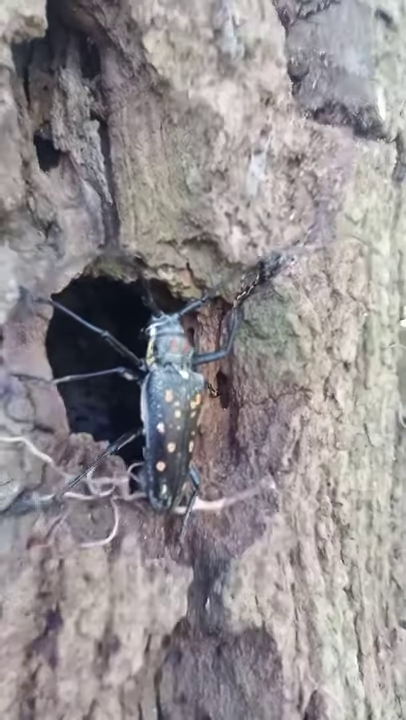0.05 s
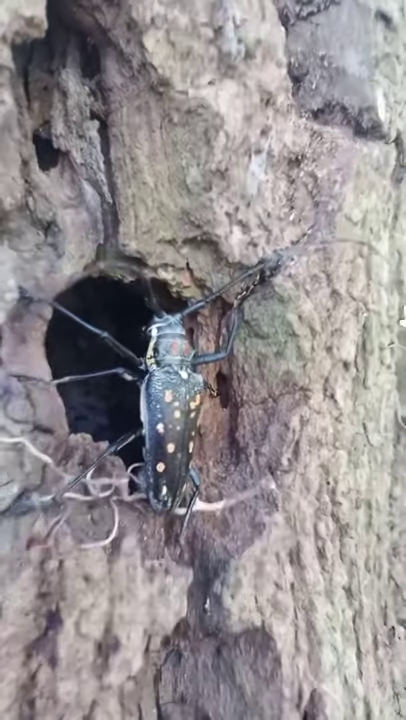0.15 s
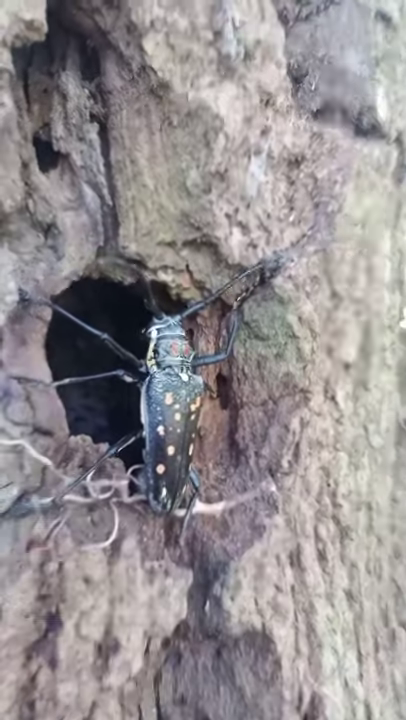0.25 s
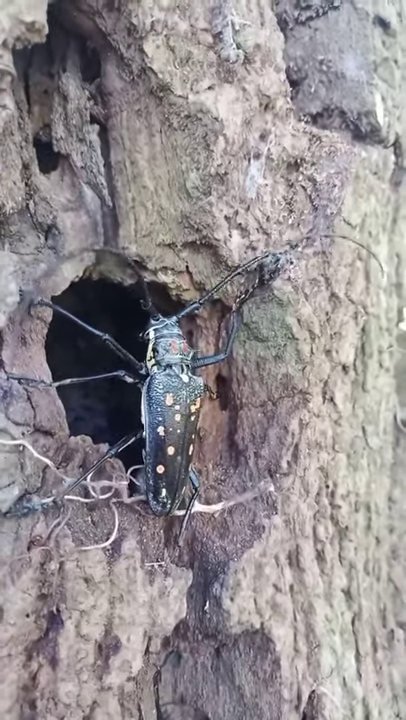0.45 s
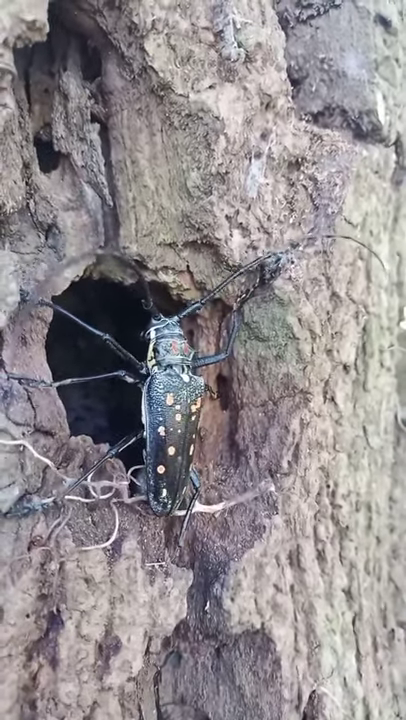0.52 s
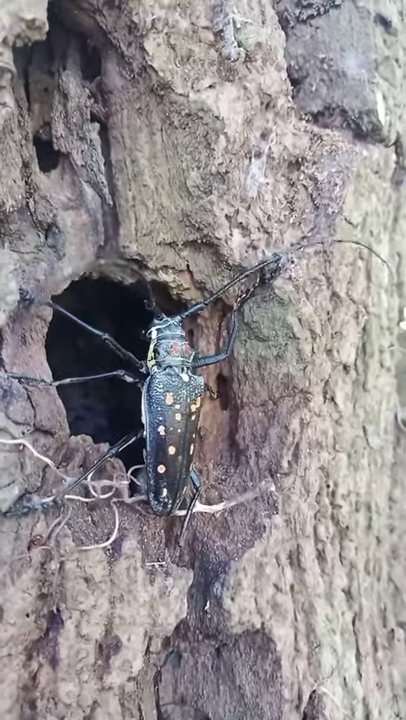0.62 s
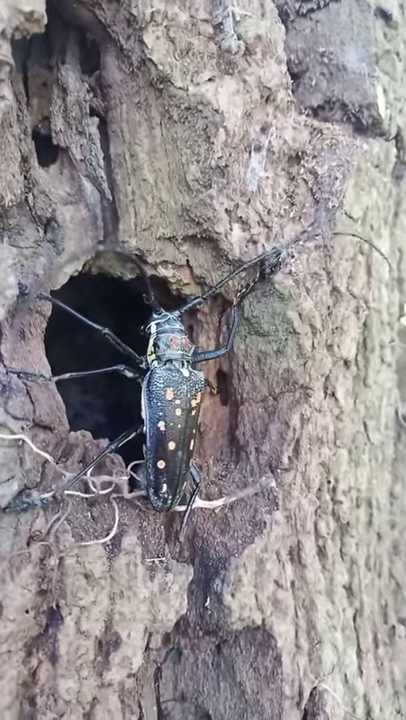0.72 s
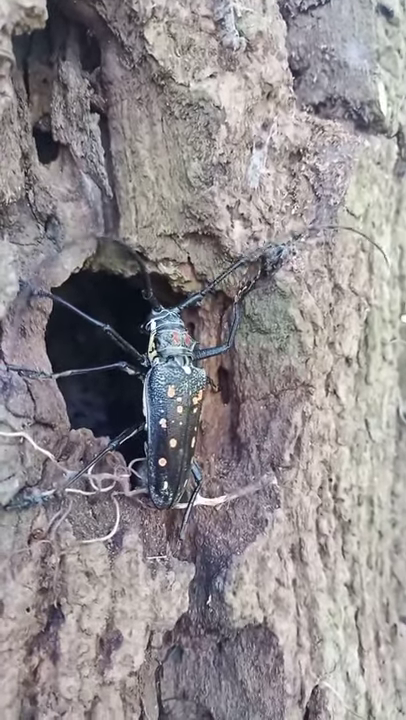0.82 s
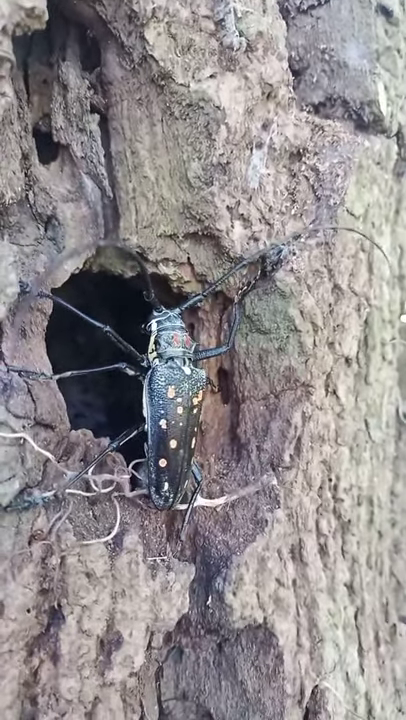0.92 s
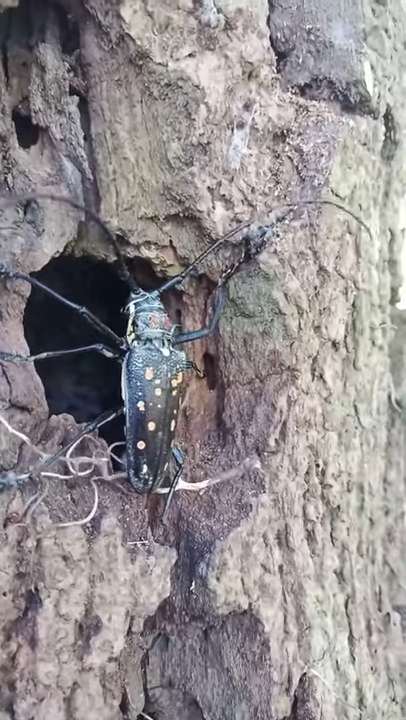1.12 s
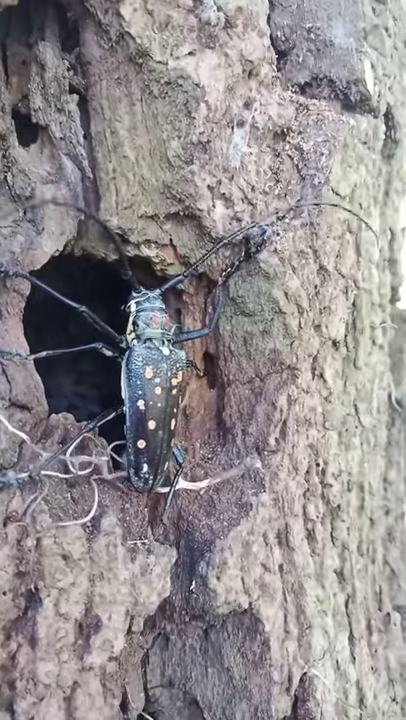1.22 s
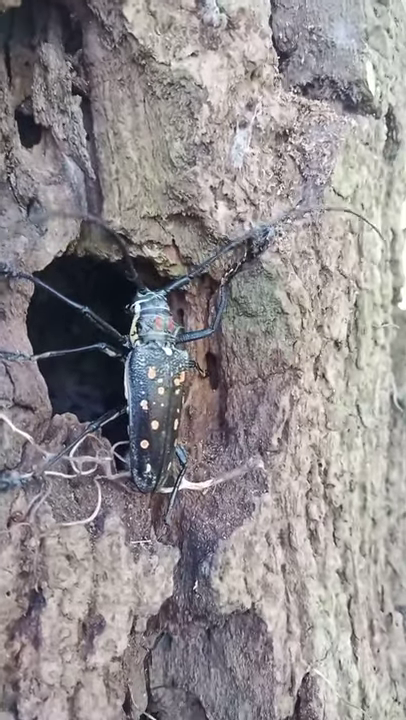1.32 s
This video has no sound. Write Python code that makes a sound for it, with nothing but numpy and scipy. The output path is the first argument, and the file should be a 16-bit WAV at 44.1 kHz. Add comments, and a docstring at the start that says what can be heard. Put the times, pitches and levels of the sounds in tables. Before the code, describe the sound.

A sharp, close knock hits the case of a hand-held microphone at about 0.2 seconds, its bright tail dying away by 0.6. Faint ticks and bumps follow. At 1.0 something, probably a finger, slides with a short hiss, then from 1.1 to the end at 1.35 makes a rasping creak of fast clicks. Soft woodland air and a faint low rumble lie underneath.

```python
"""Knock and creak on a camera

A hand-held camera in a quiet wood: soft air, a low rumble, a faint hum. One sharp knock thumps the
case, and a bright wash dies away after it. After a few faint ticks something rubs close to the
microphone, probably a finger on the case: it slides with a short hiss, then sticks and slips,
and the fast train of clicks makes a rasping creak."""
import sys
import numpy as np
from scipy import signal
from scipy.fft import rfft, irfft
from scipy.io import wavfile
from scipy.ndimage import uniform_filter1d

SR = 44100
rng = np.random.default_rng(int(sys.argv[2]) if len(sys.argv) > 2 else 0)


def wav_record(signal):
    """Record a signal, one row per channel, as 16-bit PCM in the file named by sys.argv[1]."""
    frames = np.transpose(np.atleast_2d(signal))
    bounded = np.clip(frames, -1, 1)
    # unit amplitude maps onto the largest positive 16-bit level
    quanta = np.round(bounded * 32767).astype(np.int16)
    wavfile.write(sys.argv[1], SR, quanta)


N = 59535
T = np.arange(N) / SR
HZ = np.fft.rfftfreq(N, 1 / SR)

# colour of the quiet air in the wood (frequency [Hz], relative level [dB])
AIR_COLOUR = [(25, -25), (55, -4), (130, 2), (230, -7.5), (480, -11), (800, -16), (1550, -14.5),
              (2000, -25), (4000, -26.5), (6800, -24), (8100, -32.5), (10200, -29), (13300, -44.5),
              (15500, -26)]
# fader on the air's lows and mids (time [s], gain [dB])
AIR_LOWS_FADER = [(0, 0.5), (.19, 4.5), (.45, -0.5), (.6, 0.5), (.95, 2), (1.15, -2), (1.35, -1.5)]
# fader on the low rumble (time [s], level [dB])
RUMBLE_FADER = [(0, -66), (.07, -62), (.3, -66), (.38, -61.5), (.5, -69.5), (.8, -82.5), (.92, -61.5),
                (.99, -70), (1.05, -58), (1.13, -79), (1.35, -76)]
# narrow swells of ringing (peak time [s], level [dB], centre [Hz], half length [s], width [octaves])
RING_SWELLS = [(0.044, -77, 3130, 0.063, 0.042), (0.055, -77, 4200, 0.045, .1),
               (0.055, -74.5, 2110, 0.058, 0.18), (0.202, -56.5, 321, 0.018, .08),
               (.278, -50, 380, 0.01, .06), (0.329, -57.5, 669, 0.026, 0.056),
               (0.309, -52.5, 1500, 0.028, 0.031), (0.423, -59, 1454, 0.024, 0.032),
               (0.501, -66, 4290, 0.023, 0.09), (0.527, -70.5, 5870, 0.053, 0.052)]
# soft low handling bumps (time [s], level [dB], centre [Hz], t60 [s], width [octaves])
HANDLING_BUMPS = [(.075, -64.5, 685, .1, 0.1), (.15, -62, 267, 0.24, 0.23), (.335, -55, 103, 0.15, 0.17),
                  (.422, -62, 650, 0.051, .6), (.598, -61.5, 396, 0.098, 0.8),
                  (.683, -59.5, 400, 0.11, 0.57), (.77, -63.5, 420, 0.067, 0.6),
                  (.857, -63, 654, 0.053, 0.23), (.943, -63, 450, 0.037, 0.71)]
# modes of the knocked case (frequency [Hz], level [dB], t60 [s], build-up [s])
CASE_MODES = [(400, -6, 0.017, 0.0024), (646, -29.5, 0.039, 0.00033), (1148, -30.5, 0.031, 0.003),
              (1440, -19.5, 0.02, 0.00035), (3660, -33, 0.02, 0.00042), (4100, -35, .02, 0.00085)]
# colour of the contact's crack (frequency [Hz], relative level [dB])
CRACK_COLOUR = [(150, -16), (400, -25), (900, 1), (1700, 6), (2900, -13.5), (4100, 2), (4800, -11),
                (6200, -1), (7500, -15), (10000, -7.5), (13500, -25), (15300, -4)]
# colour of the wash after the knock (frequency [Hz], relative level [dB])
WASH_COLOUR = [(60, -27), (180, -7), (420, -2.5), (650, -3.5), (850, -7.5), (1200, -2), (1460, 1),
               (1800, -6.5), (3000, -5.5), (4300, -0.5), (5000, -4), (6200, 0.5), (7700, -9), (9700, -3),
               (11500, -12), (13500, -20), (15300, -8)]
# decay of the wash, band by band (centre [Hz], t60 [s])
WASH_DECAY = [(200, 0.11), (500, 0.23), (1450, 0.35), (2500, 0.3), (5500, 0.38), (9500, 0.26),
              (15000, 0.26)]
# colour of the faint late echo (frequency [Hz], relative level [dB])
ECHO_COLOUR = [(300, -38), (1000, -18), (1450, 2), (2000, -26), (3300, -14), (4300, 8), (5000, 1.5),
               (6000, 10.5), (7700, -24), (10000, 2), (13000, -22)]
# colour of the fine crackle (frequency [Hz], relative level [dB])
CRACKLE_COLOUR = [(300, -27), (2000, -10), (5000, 1), (10000, 10), (13000, -8), (15500, -10)]
# small handling ticks (time [s], level [dB], centre [Hz], t60 [s], width [octaves])
HANDLING_TICKS = [(.544, -59, 3600, 0.035, 1), (.612, -67.5, 4340, 0.053, 0.32), (.822, -63, 5180, .05, .1),
                  (.833, -59.5, 2630, 0.031, 0.73), (.844, -66, 3030, 0.055, 0.15),
                  (.882, -71, 2600, 0.038, 0.27), (.882, -67, 7360, 0.026, 0.23)]
# colour of the sliding hiss (frequency [Hz], relative level [dB])
SLIDE_COLOUR = [(100, -3), (330, -8), (560, -15.5), (850, -5), (1200, -19), (1450, -14), (2000, -19.5),
                (3000, -25), (4400, -19.5), (5000, -22), (5550, -4.5), (6150, -8), (6800, -23), (8000, -22),
                (10100, -11), (12000, -34), (15500, -22)]
# hollow tones as the slide begins (delay [s], frequency [Hz], level [dB], t60 [s])
HOLLOW_TONES = [(0.0032, 545, -52.5, 0.077), (0.0068, 845, -50.5, 0.11), (0.0405, 335, -54.5, 0.16),
                (0.029, 1455, -62, 0.87)]
# pace of the stick-slip (time [s], rate [slips/s])
SLIP_PACE = [(1.07, 117), (1.0852, 368), (1.1073, 164), (1.1402, 108), (1.1463, 262), (1.1576, 188),
             (1.1728, 22), (1.1923, 254), (1.2095, 101), (1.2173, 268), (1.2312, 264), (1.2378, 144),
             (1.2573, 211), (1.2707, 157), (1.3196, 257), (1.3294, 352), (1.35, 201)]
# strength of the slips' clicks (time [s], gain [dB])
SLIP_FADER = [(1.07, -12), (1.1, -8), (1.145, -2), (1.19, -1.5), (1.25, -1), (1.295, 0.6), (1.325, -3.5),
              (1.35, -4.5)]
# colour of one slip's click (frequency [Hz], gain [dB])
SLIP_COLOUR = [(60, -15), (170, -10.5), (450, -29), (900, -35), (1300, -11.5), (1780, -11.5), (2350, -25),
               (3000, -20.5), (3700, -3.5), (4250, -3.5), (4650, -11), (5300, -4.5), (6100, -9),
               (6700, -14), (8200, -15), (9800, -9.5), (11200, -23), (12200, -30), (13200, -37),
               (15300, -28)]
# fader on the bright resonance that gives the creak its bite (time [s], gain [dB])
BITE_FADER = [(1.07, -34), (1.18, -13), (1.23, 1.5), (1.29, 2.5), (1.33, 4), (1.35, -8)]
# ring of the case after each slip (frequency [Hz], level [dB], t60 [s])
CASE_RING = [(179, -69.5, 0.063), (1260, -66.5, 0.056), (1430, -72.5, 0.053), (1623, -72, 0.14),
             (1735, -65.5, .05), (3820, -72, 0.058)]
# fader on the thin hiss between the slips (time [s], level [dB])
HISS_FADER = [(1.04, -100), (1.07, -82), (1.13, -90), (1.17, -67), (1.21, -74), (1.27, -66), (1.35, -82)]


def amp(db):
    """Decibels to gain."""
    return 10 ** (np.asarray(db) / 20)


def unit(x):
    """Scales to rms 1."""
    return x / np.sqrt(np.mean(x ** 2) + 1e-20)


def over_hz(points, hz=HZ):
    """Reads a table on a log-frequency axis."""
    knots, values = np.transpose(points)
    return np.interp(np.log(hz + 1), np.log(knots), values)


def over_time(points):
    """Reads a control curve at every sample."""
    return np.interp(T, *np.transpose(points))


def noise(spectrum_db):
    """Noise of rms 1 with the given colour."""
    return unit(irfft(rfft(rng.standard_normal(N)) * amp(spectrum_db), N))


def band(hz, octaves):
    """Noise of rms 1 around hz, 6 dB down at `octaves` to either side."""
    return noise(-20 * np.log10(1 + (np.log2((HZ + 1) / hz) / octaves) ** 2))


def rise(age, length):
    """Attack: a ramp from silence to full."""
    return np.clip(age / length, 0, 1)


def fade(age, t60):
    """Decay: holds until age zero, then falls 60 dB in t60."""
    return np.exp(-np.log(1000) * np.maximum(age, 0) / t60)


def through(x, response):
    """Convolves and keeps the length of the scene."""
    return signal.fftconvolve(x, response)[:N]


def click(colour, size=4096):
    """A tight, minimum-phase click with the given colour."""
    log_gain = np.log(amp(over_hz(colour, abs(np.fft.fftfreq(size, 1 / SR)))))
    spectrum = np.exp(np.conj(signal.hilbert(log_gain)))
    return np.fft.ifft(spectrum).real[:size // 2]


def wavering(hz, wander_hz, depth=0.23):
    """A tone of rms 1 whose pitch and strength wander."""
    slow = over_hz([(1, 0), (12, 0), (30, -40), (100, -100)])  # (rate [Hz], relative level [dB])
    pitch = hz + wander_hz * noise(slow)
    strength = 1 + depth * noise(slow)
    return unit(np.sin(2 * np.pi * np.cumsum(pitch) / SR) * strength)


def air(level_db=-64.5, patchy_db=2, split_hz=3700):
    """The wood's soft bed of air, patchy in time and colour; its lows and mids drift in level."""
    spectrogram = signal.stft(noise(over_hz(AIR_COLOUR)), nperseg=512)[2]
    patches = uniform_filter1d(rng.standard_normal(spectrogram.shape), size=8, axis=0)
    patches = unit(uniform_filter1d(patches, size=7, axis=1))
    bed = unit(signal.istft(spectrogram * amp(patchy_db * patches))[1][:N])
    lows = signal.sosfiltfilt(signal.butter(2, split_hz, fs=SR, output="sos"), bed)
    return amp(level_db) * (bed + lows * (amp(over_time(AIR_LOWS_FADER)) - 1))


def rumble_and_hum():
    """Two low wavering tones: a rumble that comes and goes under a faint hum."""
    rumble = amp(over_time(RUMBLE_FADER)) * wavering(hz=70.8, wander_hz=3.2)
    hum = amp(-73) * wavering(hz=176, wander_hz=2.5)
    return rumble + hum


def swells():
    """Faint narrow rings fade in and out."""
    return sum(amp(db) * np.exp(-((T - peak) / half_length) ** 2) * band(hz, octaves)
               for peak, db, hz, half_length, octaves in RING_SWELLS)


def handling(contacts, attack_s):
    """Small contacts with the case, each a short puff of noise around its own frequency."""
    return sum(amp(db) * rise(T - start, attack_s) * fade(T - start - attack_s, t60) * band(hz, octaves)
               for start, db, hz, t60, octaves in contacts)


def knock(start_s, low_cut_hz=153):
    """The contact cracks, and heavily damped modes of the case give the thump."""
    age = np.maximum(T - start_s, 0)
    thump = sum(amp(db) * (1 - np.exp(-age / build)) * fade(age, t60) * -np.sin(2 * np.pi * hz * age)
                for hz, db, t60, build in CASE_MODES)
    thump = signal.sosfilt(signal.butter(2, low_cut_hz, "high", fs=SR, output="sos"), thump)
    crack = amp(-25.5) * rise(age, 0.0001) * fade(age, t60=0.025) * noise(over_hz(CRACK_COLOUR))
    return thump + crack


def wash(start_s, level_db=-35, bloom_s=0.036, bloom_db=5.5):
    """Scattered sound blooms after the knock, dies band by band and leaves a faint echo."""
    age = T - start_s
    spectrum = rfft(noise(over_hz(WASH_COLOUR)))
    centres, t60s = np.transpose(WASH_DECAY)
    scattered = np.zeros(N)
    for solo, t60 in zip(np.eye(len(centres)), t60s):
        crossover = over_hz(list(zip(centres, solo)))
        scattered += irfft(spectrum * crossover, N) * fade(age - bloom_s, t60)
    bloom = amp(level_db - bloom_db * (1 - rise(age, bloom_s))) * rise(age, 0.0012)
    echo = amp(-54.5) * rise(age, bloom_s) * fade(age, t60=1.04) * noise(over_hz(ECHO_COLOUR))
    return scattered * bloom + echo


def crackle(start_s, end_s, ticks_per_s=35):
    """Tiny random ticks as the grip shifts."""
    hits = (rng.random(N) < ticks_per_s / SR) * (T > start_s) * (T < end_s)
    envelope = through(hits * rng.uniform(0.61, 2.8, N), fade(T, t60=0.012))
    return amp(-73) * envelope * noise(over_hz(CRACKLE_COLOUR))


def slide(start_s, hold_s=0.041):
    """Smooth sliding hisses and sounds a few hollow tones before the surfaces grip."""
    age = T - start_s
    envelope = rise(age, 0.011) * fade(age - hold_s, t60=0.16)
    hiss = amp(-57.5) * envelope * noise(over_hz(SLIDE_COLOUR))
    tones = sum(amp(db) * rise(age - delay, 0.0058) * fade(age - delay, t60) * np.sin(2 * np.pi * hz * age)
                for delay, hz, db, t60 in HOLLOW_TONES)
    return hiss + tones


def stick_slip(scatter_db=0.8):
    """The surfaces catch and let go: one impulse per slip, each a little different in strength."""
    cycles = np.cumsum(over_time(SLIP_PACE) * (T >= SLIP_PACE[0][0])) / SR
    impulses = np.diff(np.floor(cycles + 0.5), prepend=0)
    return impulses * amp(scatter_db * rng.standard_normal(N))


def shell_smear(x, lag_s=0.00031, corner_hz=4800):
    """Lows travel more slowly through the shell, which smears each click."""
    lag = lag_s / (1 + (HZ / corner_hz) ** 2)
    phase = 2 * np.pi * np.cumsum(lag) * SR / N
    return irfft(rfft(x) * np.exp(-1j * phase), N)


def creak(bite_hz=4000, tail_db=-11.5):
    """Every slip sends a sharp click through the case, which rings briefly; a thin hiss runs between."""
    slips = stick_slip()
    clicks = amp(-18.5) * through(slips * amp(over_time(SLIP_FADER)), click(SLIP_COLOUR))
    ping = amp(-45.5) * rise(T, 0.00054) * fade(T, t60=0.0048) * np.cos(2 * np.pi * bite_hz * T)
    bite = through(slips * amp(over_time(BITE_FADER)), ping)
    rasp = shell_smear(clicks + bite)
    diffuse = rng.standard_normal(N) * fade(T, t60=0.044) * rise(T, 0.0048)
    tail = amp(tail_db) * through(rasp, diffuse / np.linalg.norm(diffuse))
    ring = sum(amp(db) * fade(T, t60) * np.sin(2 * np.pi * hz * T) for hz, db, t60 in CASE_RING)
    hiss = amp(over_time(HISS_FADER)) * band(hz=5450, octaves=0.15)
    return rasp + tail + through(slips, ring) + hiss


def scene(knock_s=0.2198):
    """The mono mix: all sources at one microphone."""
    ticks = handling(HANDLING_TICKS, attack_s=0.00068)
    bumps = handling(HANDLING_BUMPS, attack_s=0.0031)
    grip = crackle(start_s=0.36, end_s=0.8)
    ambience = air() + rumble_and_hum()
    hit = knock(knock_s) + wash(knock_s)
    return (ambience + swells() + bumps + hit + grip + ticks + slide(start_s=1.013) + creak())[None]


def record(dry, cutoff_hz=15850):
    """A steep low-pass takes off the very top."""
    low_pass = signal.firwin(511, cutoff_hz, window=("kaiser", 8), fs=SR)
    return signal.oaconvolve(dry, low_pass[None], "same")


dry = scene()
out = record(dry)
wav_record(out)
```